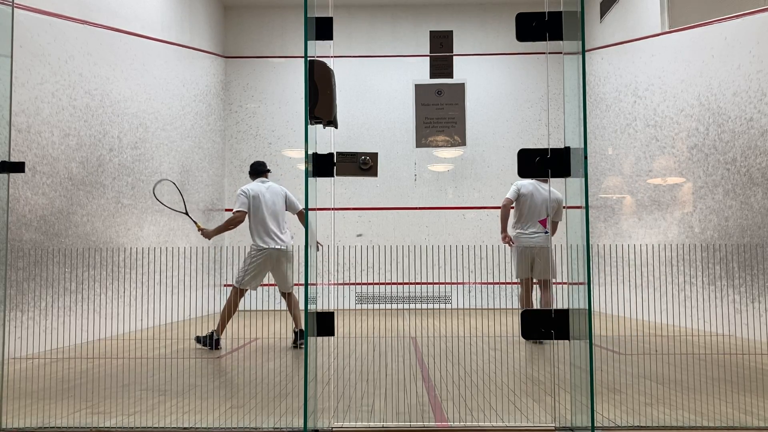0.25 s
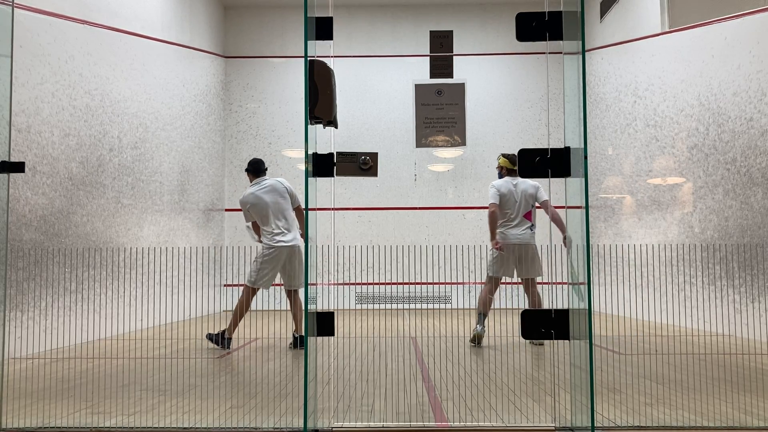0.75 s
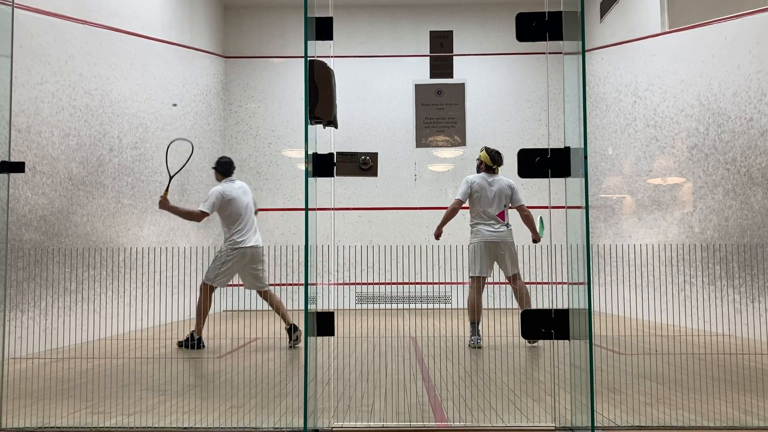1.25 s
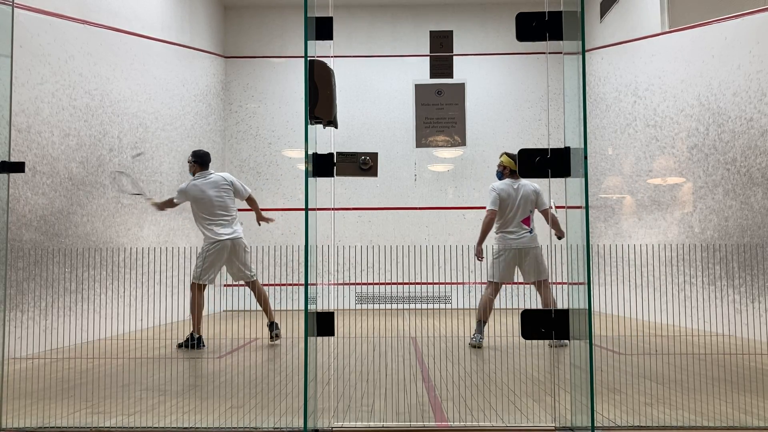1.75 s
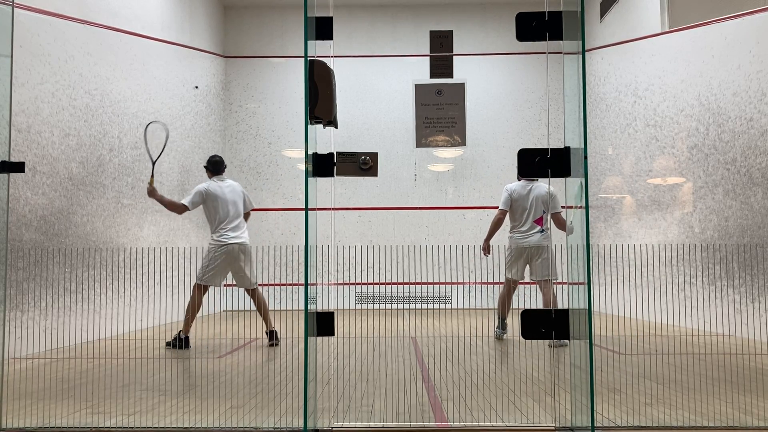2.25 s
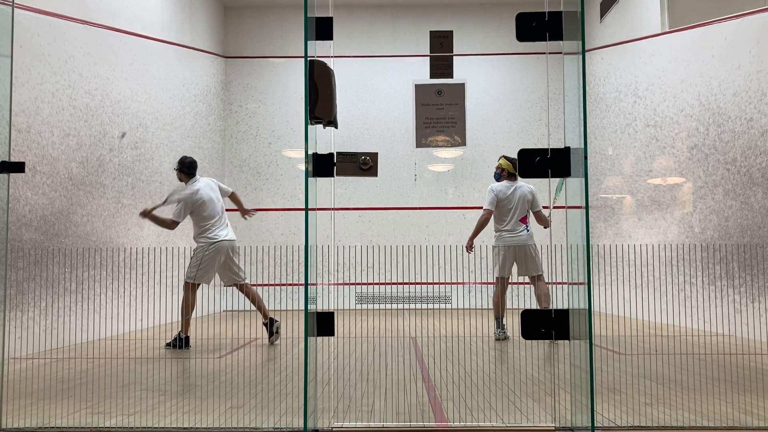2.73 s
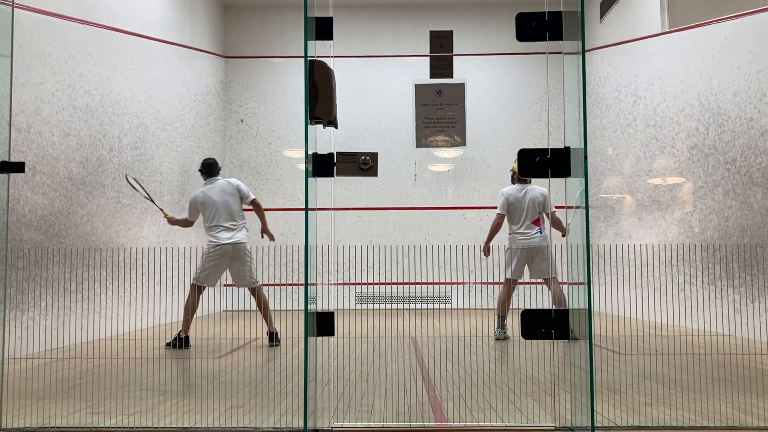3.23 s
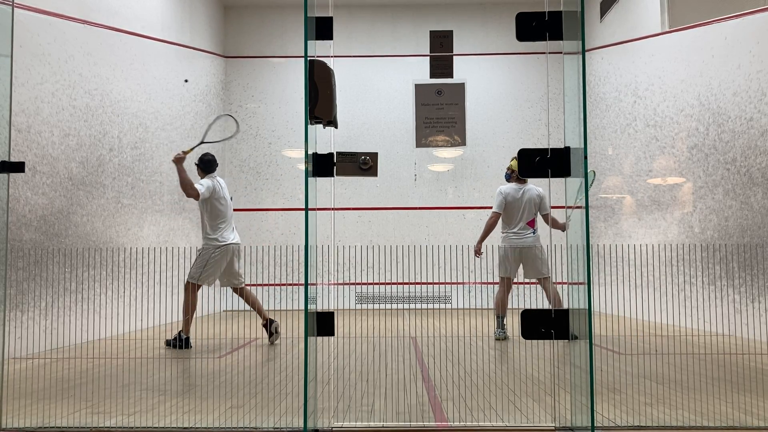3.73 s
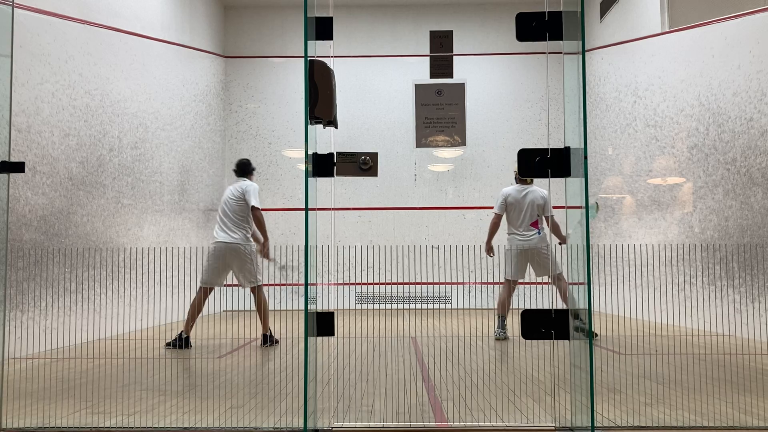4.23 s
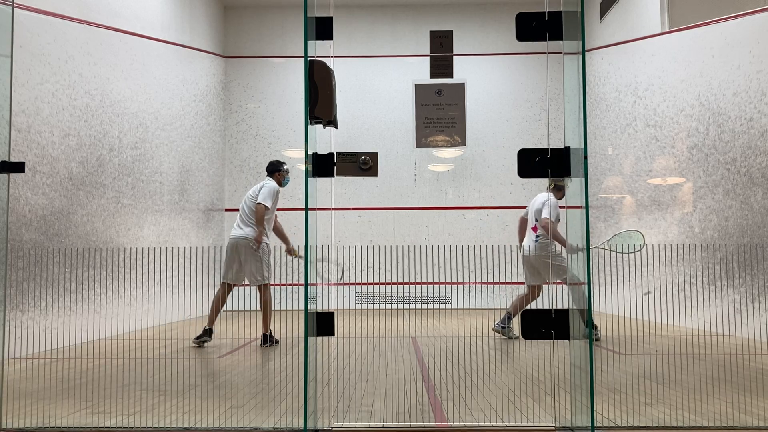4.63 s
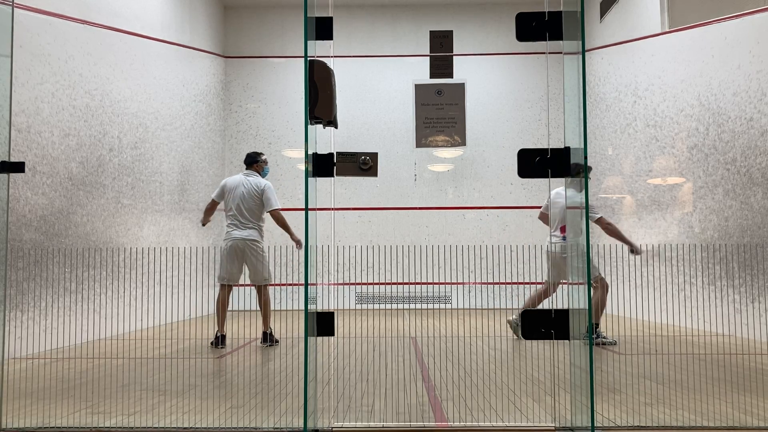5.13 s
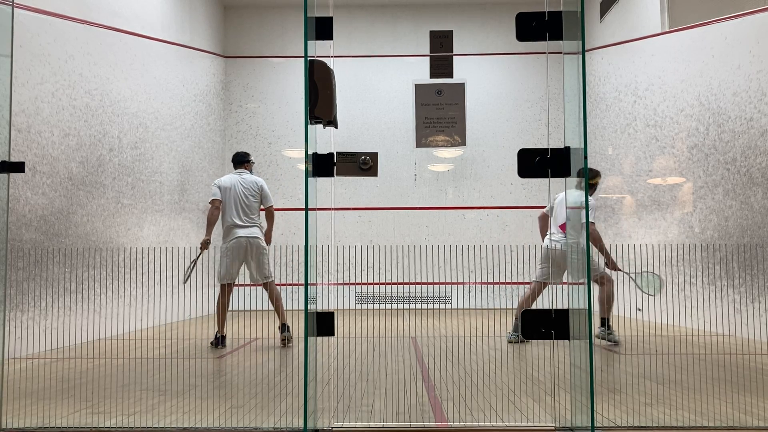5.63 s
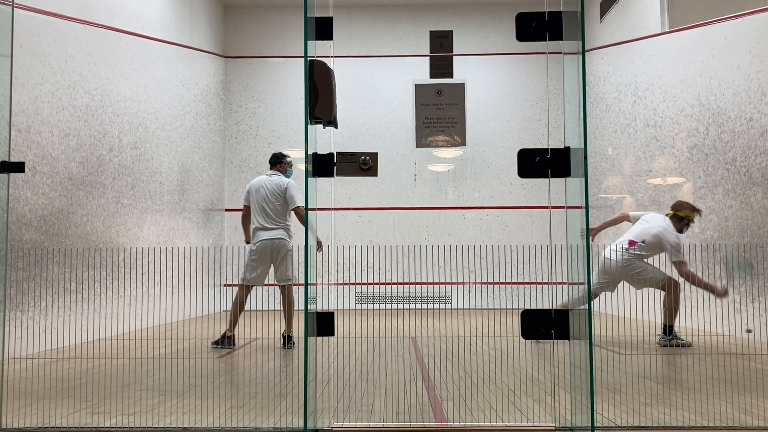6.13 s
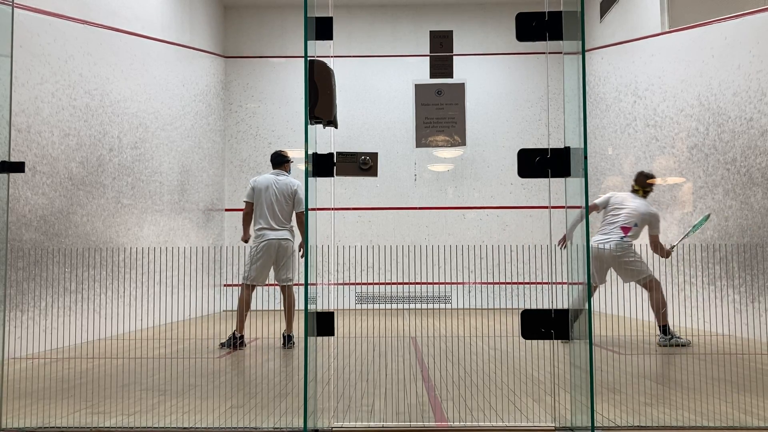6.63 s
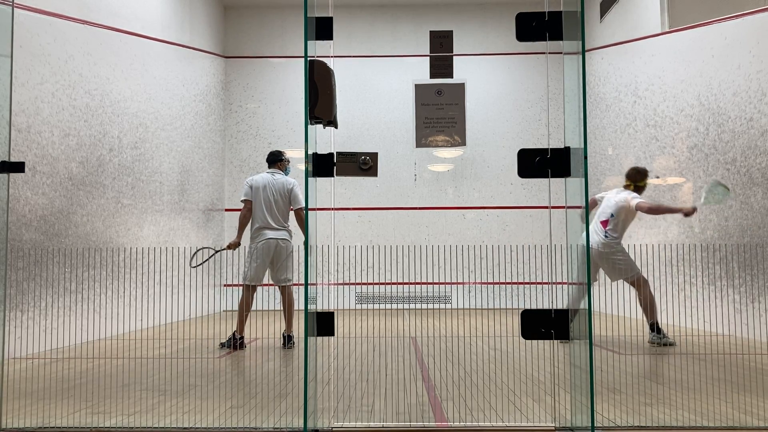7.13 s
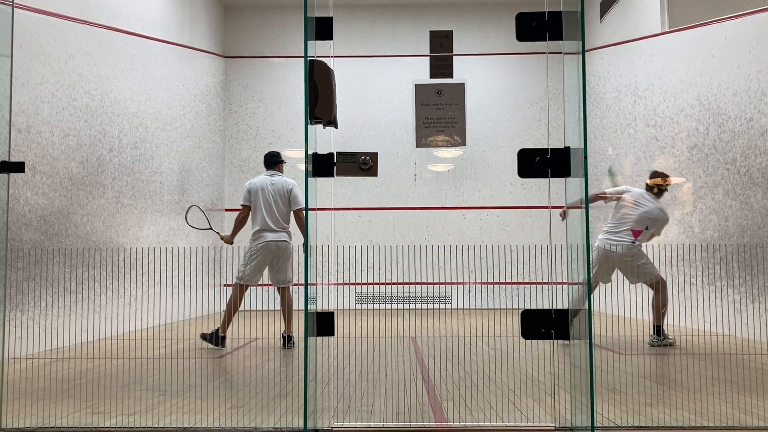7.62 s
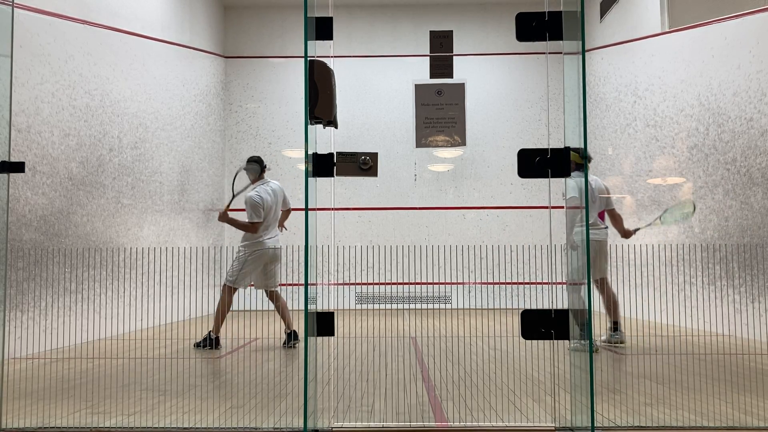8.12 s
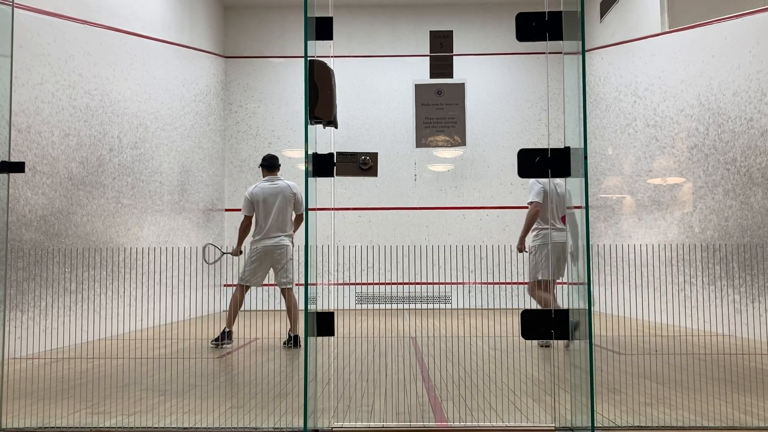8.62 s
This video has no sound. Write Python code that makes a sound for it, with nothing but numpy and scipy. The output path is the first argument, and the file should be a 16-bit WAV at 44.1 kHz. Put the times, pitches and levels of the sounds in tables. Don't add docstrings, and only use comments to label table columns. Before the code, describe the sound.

A squash warm-up heard through glass: sharp ball knocks on racquet and wall ring out in a long indoor echo over low ventilation rumble.

```python
import sys
import numpy as np
from scipy import signal
from scipy.fft import rfft, irfft, next_fast_len
from scipy.io import wavfile
from scipy.ndimage import uniform_filter1d

SR = 44100
rng = np.random.default_rng(int(sys.argv[2]) if len(sys.argv) > 2 else 0)


def gain_from_db(level_db):
    decades = np.asarray(level_db, float) / 20
    return 10 ** decades


def unload_audio(sound):
    columns = np.transpose(np.atleast_2d(sound))
    steps = np.round(np.clip(columns, -1, 1) * 32767)
    wavfile.write(sys.argv[1], SR, steps.astype(np.int16))


N = 391149
PRE = 6000

# (first-wave scatter [s], rise [share of scatter], far-wall echo [s], echo level [dB], tail wait [s])
FRONT_WALL = (.0055, .17, .057, -13, .004)


def evened(x):
    return x / np.sqrt(np.mean(x ** 2) + 1e-20)


def read(points, hz):
    f, value = np.transpose(points)
    return np.interp(np.log(hz + 1), np.log(f + 1), value)


def add(mix, s, sound):
    part = mix[..., round(s * SR) + PRE:][..., :sound.shape[-1]]
    part += sound[..., :part.shape[-1]]


def resonate(x, hz, width_hz):
    turn = np.exp(2j * np.pi * np.cumsum(hz * np.ones(x.shape[-1])) / SR)
    r = np.exp(-np.pi * width_hz / SR)
    return 2 * (turn * signal.lfilter([1 - r], [1, -r], x / turn)).real


def racquet_blows():
    back_corner, mid_court = (0.0059, .3, .0395, -9, .008), (.0033, .2, .0395, -6, .008)
    # (time [s], knock 0.7-1.5 kHz [dB], thud re knock [dB], direct sound [dB], brightness [dB/octave])
    lobs = [
        (0.639, -33.5, 2.3, 0.9, 1.5),
        (1.795, -34.5, 3.5, -3.5, -.4),
        (3.001, -34, 5, -0.5, .1),
        (8.323, -35.5, 0, -2.1, -0.17),
    ]
    drives = [
        (5.212, -20, 3.5, -4.5, .2),
        (7.523, -22, 0.1, 2.8, -0.23),
    ]
    earlier_drive = (-.09, -20.5, 0.5, -10, 0.4)
    flick = [
        (6.318, -33.5, 12, 1.2, .05),
    ]
    volley = [
        (4.128, -22.5, -1.5, -2.1, .05),
    ]
    # (frequency [Hz], width [Hz], level [dB])
    slack_strings = [(290, 190, -1), (900, 250, 0), (1243, 32, 10.5), (1960, 28, -29), (2780, 140, -5),
                     (3630, 960, -10)]
    taut_strings = [(911, 230, -4.5), (1438, 100, 1), (2260, 56, -23.5), (6800, 410, -6.5)]
    frame = [(900, 190, -3), (330, 63, 0.5), (1582, 220, -6)]
    return [(lobs, slack_strings, back_corner, -8, -10.5, 0.29),
            (drives + [earlier_drive], taut_strings, mid_court, -6.5, -17, 2),
            (flick, taut_strings, mid_court, -6.5, -10.5, 2.9),
            (volley, frame, FRONT_WALL, -9, -16.5, -1)]


def wall_blows():
    foot_of_wall, top_of_wall = (.009, .45, .057, -14, .003), (.005, .8, .056, -7, .005)
    # (time [s], knock 0.7-1.5 kHz [dB], thud re knock [dB], direct sound [dB], brightness [dB/octave])
    high_wall = [
        (.920, -25, -0.44, 4.1, 0.47),
        (2.102, -25.5, -0.2, 4.2, -0.13),
        (3.328, -28.5, 0.72, 3.2, 0.27),
        (6.662, -27.5, .7, 5.1, -0.017),
        (8.688, -28.5, -1.2, 4.1, -0.35),
    ]
    hard_wall = [
        (.075, -14, -4.5, 0.91, -.3),
        (4.29, -16, -2, -0.11, .05),
        (7.6995, -18, -1, -0.73, 0.4),
    ]
    low_board = [
        (5.3635, -8.8, -1.4, -3.5, .3),
    ]
    bounces = [
        (1.678, -52.5, -9, 1.5, -1.7),
        (4.974, -53, -8, 2.9, 1.3),
    ]
    # (frequency [Hz], width [Hz], level [dB])
    plaster_soft = [(324.6, 230, -0.5), (1077, 50, -1.5), (1350, 400, -15)]
    plaster_hard = [(880, 290, -6.5), (400, 180, -7), (2087, 234, -7.5)]
    board = [(113, 46, -15.5), (250, 31, -9.5), (444, 37, -16.5), (790, 240, -11.5), (1440, 60, -11),
             (2170, 41, -6)]
    return [(high_wall, plaster_soft, top_of_wall, -9.6, -17, .3),
            (hard_wall, plaster_hard, FRONT_WALL, -6.5, -16.5, 0.67),
            (low_board, board, foot_of_wall, -3.2, -5.5, -1.6),
            (bounces, [], FRONT_WALL, 1.5, -12.5, 0.82)]


def knock(knock_db, thud_db, crack_db, snap_db, rings, tilt_db=0):
    band_hz = [480, 750, 1400, 3200, 9000]
    band_width_hz = np.array([400, 800, 800, 3000, 7000])
    # (frequency [Hz], gain [dB])
    glass = [(20, -51.5), (70, 1.5), (120, 0), (250, 2), (500, -3), (640, -11), (800, 0.5), (1000, -2.5),
             (1200, -6.5), (2200, 0), (4000, 5), (5800, -0.5), (9500, 8), (15500, -4)]
    hz = abs(np.fft.fftfreq(8192, 1 / SR))
    per_hz_db = np.array([thud_db, 0, 0, crack_db, snap_db]) - 10 * np.log10(band_width_hz / band_width_hz[1])
    gain = gain_from_db(knock_db + 3.5 + read(list(zip(band_hz, per_hz_db)), hz) + read(glass, hz))
    gain *= gain_from_db(tilt_db * np.log2(np.clip(hz, 60, 12000) / 1000))
    gain *= 1 + sum(2 * gain_from_db(db) / (1 + (2 * (hz - f) / width) ** 2) for f, width, db in rings)
    spectrum = np.exp(np.conj(signal.hilbert(np.log(gain))))
    return np.fft.ifft(spectrum).real[:4096]


def arrival(scatter_s, rise, far_s, far_db):
    # (delay [s], level [dB])
    echoes = [(.005, -6), (.012, -9.5), (.021, -14.5)]
    t = np.arange(4000) / SR
    paths = [(0, 0), *echoes, (far_s, far_db), (1.2 * far_s, far_db - 6)]
    delay_s, level_db = np.transpose(paths)[:, :, None]
    late = np.maximum(t - delay_s, 0) / scatter_s
    power = gain_from_db(level_db) ** 2 * np.exp(-2 * late) * np.minimum(late / rise, 1) ** 2
    return rng.standard_normal((2, len(t))) * np.sqrt(power.sum(axis=0))


def court():
    # (frequency [Hz], t60 [s])
    decay = [(60, 1.1), (125, 1.1), (250, 1.78), (500, 1.725), (1000, 2.225), (2000, 1.484), (3000, 1.213),
             (5500, 0.88), (8000, 0.69), (12000, 0.6), (16000, .4)]
    frames = dict(nperseg=512, noverlap=384)
    hz, t, z = signal.stft(rng.standard_normal((2, 2 * SR)), SR, **frames)
    t60_s = read(decay, hz)[:, None]
    slow = gain_from_db(-60 * t / t60_s)
    quick = gain_from_db(-15.5 - 60 * t / (0.1 * t60_s))
    lumps = uniform_filter1d(rng.standard_normal(z.shape[1:]), size=24, axis=0)
    lumps = evened(uniform_filter1d(lumps, size=4, axis=1))
    modes = evened(uniform_filter1d(rng.standard_normal(z.shape[1:]), size=150, axis=1))
    z = z * gain_from_db(2.1 * lumps * np.exp(-t / 0.51) + 1.9 * modes)
    tail = signal.istft(z * (slow + quick), SR, **frames)[1]
    t = np.arange(tail.shape[1]) / SR
    return tail * (1 - np.exp(-np.maximum(t - .003, 0) / 0.01))


def panel_rings():
    # (time [s], frequency [Hz], level [dB])
    rings = [(.076, 846, -9.5), (.922, 1405, -22), (.945, 306, -33), (2.105, 1030, -22.5), (2.11, 320, -30),
             (3.003, 900, -28.5), (3.331, 1890, -25), (4.127, 900, -21), (4.293, 880, -9.5),
             (5.37, 120, -16), (5.369, 238, -13), (6.667, 1060, -18.5), (7.708, 900, -12.5),
             (8.323, 1240, -30.5), (8.691, 1054, -25.5)]
    t = np.arange(6000) / SR
    sounds = []
    for s, hz, db in rings:
        t60_s = 0.051 * (1000 / hz) ** 0.77
        pair = np.sin(2 * np.pi * hz * t) + .45 * np.sin(2 * np.pi * 1.09 * hz * t)
        sounds.append((s, gain_from_db(db - 60 * t / t60_s) * (1 - np.exp(-t / 0.0033)) * pair))
    return sounds


def racquet_swishes():
    # (start [s], length [s], level [dB], centre [Hz])
    swishes = [
        (.56, 0.061, -57, 8000),
        (1.66, .074, -49, 900),
        (2.79, .22, -61.5, 3260),
        (4.08, .15, -54, 5080),
        (6.29, .03, -60.5, 7000),
    ]
    swings = [
        (5.15, 0.091, -46, 5700),
        (7.46, .05, -56, 5030),
    ]
    return [(swishes, 0.74, .45, 1.5, 0), (swings, 1, .88, 1.5, 0)]


def shoe_sounds():
    # (start [s], length [s], level [dB], pitch or centre [Hz])
    squeaks = [
        (1.58, 0.13, -52.5, 557),
        (2.82, 0.19, -74, 6700),
        (2.82, .16, -70, 3850),
        (2.85, .14, -74, 10100),
    ]
    chirps = [
        (.578, .032, -49, 4500),
        (.578, 0.029, -58, 8700),
    ]
    steps = [
        (2.03, 0.051, -41, 250),
        (3.83, 0.032, -44.5, 297),
        (7.425, 0.037, -50, 250),
        (8.355, .15, -38, 290),
    ]
    scrapes = [(1.45, 0.041, -72, 3950), (2.75, .022, -76, 6950), (3.68, .02, -84, 6000),
               (4.88, .031, -62, 9000), (6.03, 0.069, -59.5, 10040), (6.24, .047, -65.5, 10500),
               (7.03, 0.044, -72, 10630), (7.13, .046, -72, 4930), (7.40, .021, -63, 8100),
               (8.59, .066, -66, 7900), (8.81, .034, -58, 5950), (8.866, .02, -50, 5000)]
    return [(squeaks, .06, 0.38, 3, 0), (chirps, 0.074, .6, 3, .16),
            (steps, 0.73, 0.13, 4.4, 0), (scrapes, .82, .08, 3, 0)]


def scuff(length_s, db, hz, share, rise, grain_db, fall):
    u = np.linspace(0, 1, max(int(length_s * SR), 64))
    shape = np.interp(u, [0, np.clip(rise, .02, .95), 1], [0, 1, 0]) ** 2
    rub, lumps = rng.standard_normal((2, SR // 2))[:, :len(u)]
    rub = rub * gain_from_db(grain_db * evened(uniform_filter1d(lumps, size=60)))
    pitch_hz = hz * (1 + fall * (1 - 2 * u))
    for _ in range(2):
        rub = resonate(rub, pitch_hz, hz * share)
    return gain_from_db(db) * shape * evened(rub)


def ventilation():
    # (frequency [Hz], density [dB/Hz])
    duct = [(15, -50), (25, -31.5), (48, -8), (64, -2), (82, -11), (126, -8), (185, -9.5), (219, -12),
            (273, -11), (549, -30), (682, -35), (1110, -31), (8000, -67.5), (10400, -117), (17600, -120)]
    # (frequency [Hz], width [Hz], level [dB])
    fan = [(78.3, 8.1, -38), (120, 7.8, -41.5), (219.4, 22, -49.5)]
    rumble_db, hiss_db = -34.5, -82
    hz = np.fft.rfftfreq(N, 1 / SR)
    noise = rng.standard_normal((len(fan) + 2, 2, N))
    swell = evened(uniform_filter1d(uniform_filter1d(rng.standard_normal(N), 9000), 9000))
    rumble = evened(irfft(rfft(noise[0]) * gain_from_db(read(duct, hz)), N))
    rumble = gain_from_db(rumble_db - 6 + 0.45 * swell) * rumble
    hiss = gain_from_db(hiss_db) * noise[1]
    tones = sum(gain_from_db(db) * evened(resonate(resonate(n, f, w), f, w)) for n, (f, w, db) in zip(noise[2:], fan))
    return rumble + tones + hiss


def scene():
    mix, fed = np.zeros((2, N + PRE)), np.zeros((4, N + PRE))
    air, tails = ventilation(), [court() for _ in fed]
    blows = [(*row, *kind) for rows, *kind in racquet_blows() + wall_blows() for row in rows]
    for k, blow in enumerate(blows):
        s, knock_db, thud_db, direct_db, bright_db, rings, place, crack_db, snap_db, tilt_db = blow
        *path, wait_s = place
        colour = (knock_db, thud_db, crack_db, snap_db, rings)
        add(fed[k % 4], s + wait_s, knock(*colour, bright_db))
        click = knock(*colour, tilt_db + 1.6 * bright_db)
        add(mix, s, gain_from_db(direct_db + 9.0) * signal.fftconvolve(arrival(*path), click[None], axes=1))
    moves = [(*row, *kind) for rows, *kind in racquet_swishes() + shoe_sounds() for row in rows]
    for k, (s, *move) in enumerate(moves):
        rub = scuff(*move)
        add(mix, s, rub[None])
        add(fed[k % 4], s, gain_from_db(-33.0) * rub)
    for s, ring in panel_rings():
        add(mix, s, ring[None])
    for train, tail in zip(fed, tails):
        mix += signal.oaconvolve(train[None], tail, axes=1)[:, :N + PRE]
    return mix[:, PRE:] + air


def top_cut(x):
    return signal.sosfilt(signal.butter(12, 16850, fs=SR, output="sos"), x)


def record(dry):
    # (frequency [Hz], likeness [0-1])
    likeness = [(60, .99), (180, .98), (300, .83), (600, .6), (1000, .35), (2500, .4), (5600, .2),
                (6600, .95), (7200, .995)]
    # (frequency [Hz], lead [rad])
    phase_lead = [(0, 0), (900, -.2), (2400, 2.3), (7000, 2 * np.pi), (24640, 10 * np.pi)]
    # (frequency [Hz], left over right [dB])
    balance = [(60, -3), (110, -1.5), (200, -3.5), (380, 2), (700, 0.5), (1290, 2), (2380, 3), (4400, 1.5),
               (8120, -0.5), (15000, 1)]
    size = next_fast_len(N + 512)
    hz = np.fft.rfftfreq(size, 1 / SR)
    left, other = rfft(dry, size)
    same = np.clip(read(likeness, hz), 0, 1)
    ahead = np.exp(1j * np.interp(hz, *np.transpose(phase_lead)))
    right = same * left * ahead + np.sqrt(1 - same ** 2) * other
    edge = 1 / (1 + (hz / 16000) ** 120)
    tilt = gain_from_db(read(balance, hz) / 2)
    sound = irfft(np.array([left * tilt, right / tilt]) * edge, size)[:, :N]
    sound = sound / (1 + abs(sound / .88) ** 6) ** (1 / 6)
    return top_cut(sound)


dry = scene()
out = record(dry)
unload_audio(out)
```